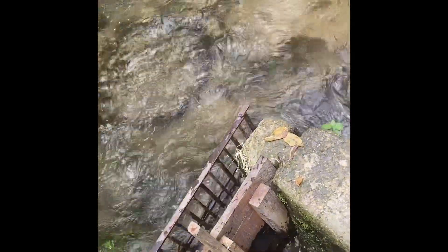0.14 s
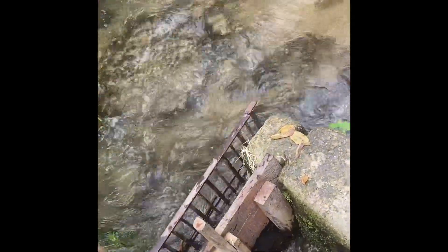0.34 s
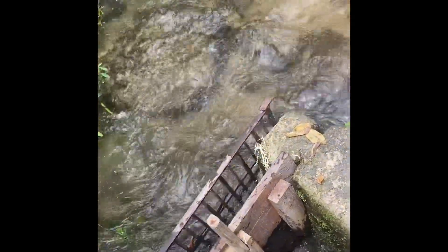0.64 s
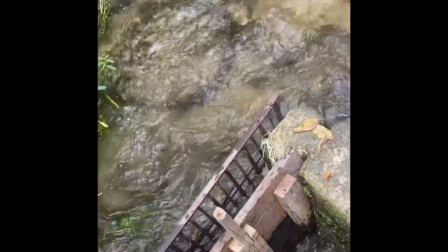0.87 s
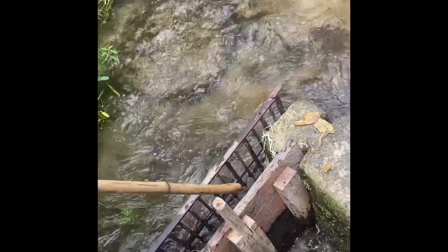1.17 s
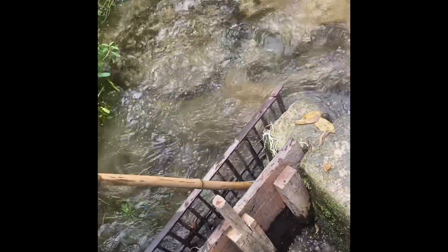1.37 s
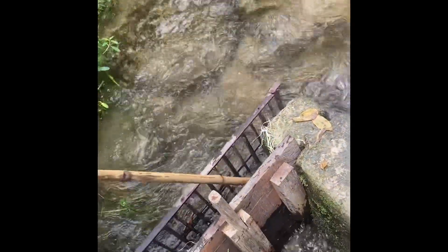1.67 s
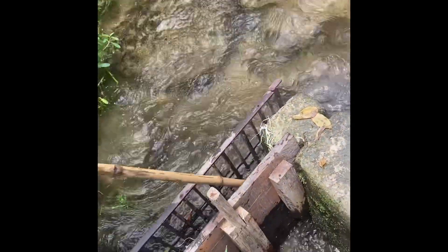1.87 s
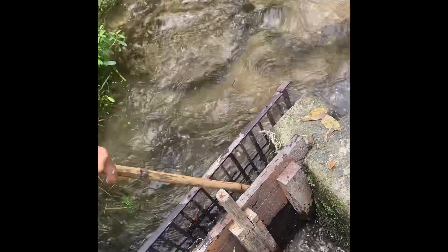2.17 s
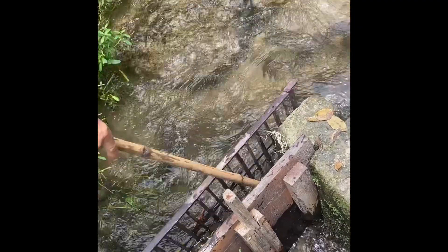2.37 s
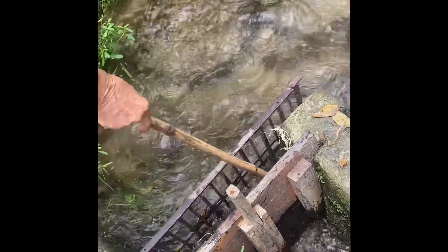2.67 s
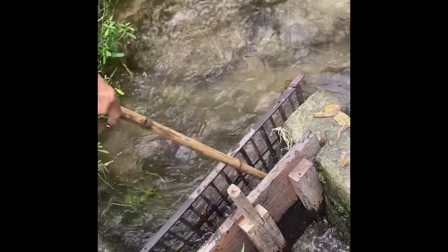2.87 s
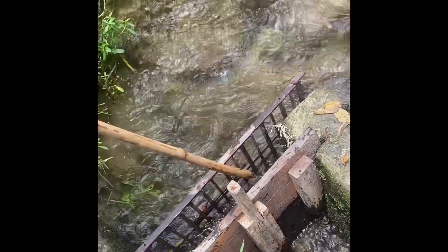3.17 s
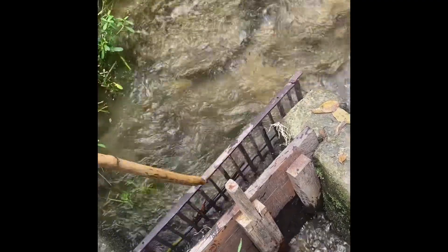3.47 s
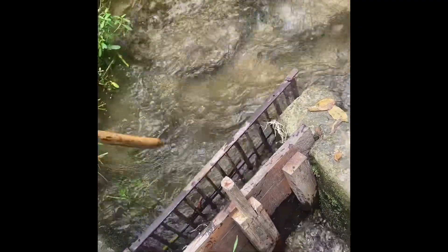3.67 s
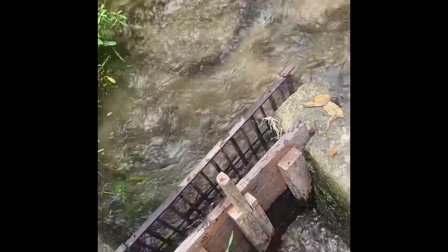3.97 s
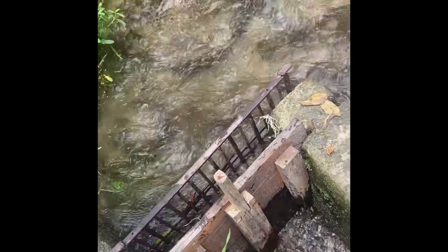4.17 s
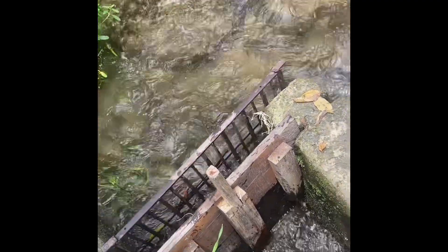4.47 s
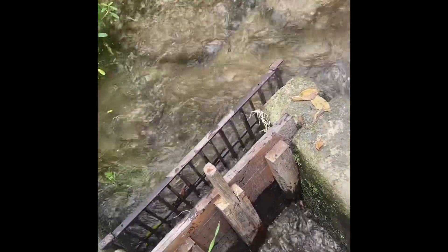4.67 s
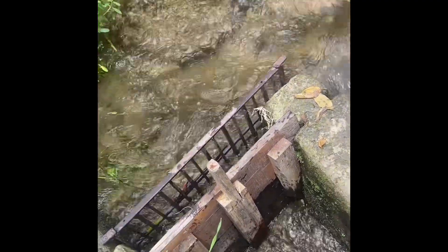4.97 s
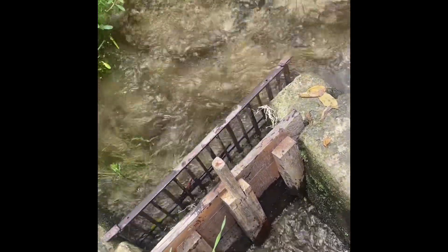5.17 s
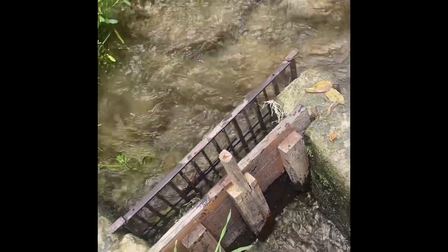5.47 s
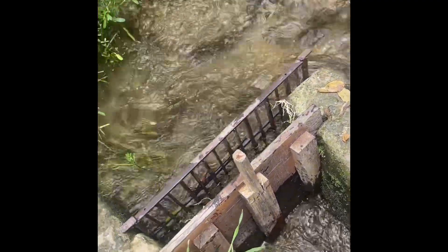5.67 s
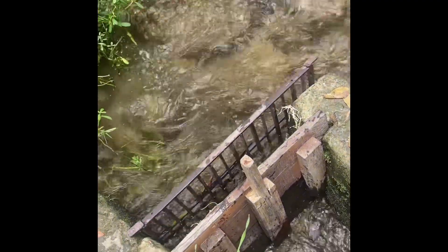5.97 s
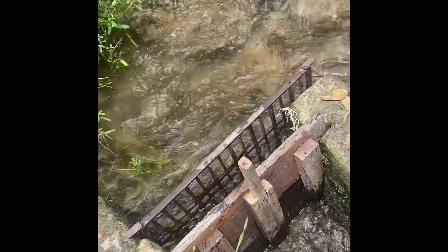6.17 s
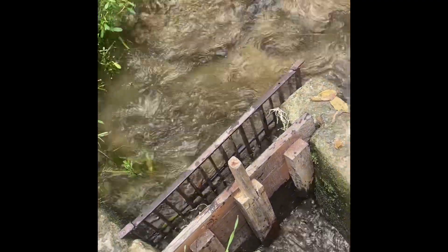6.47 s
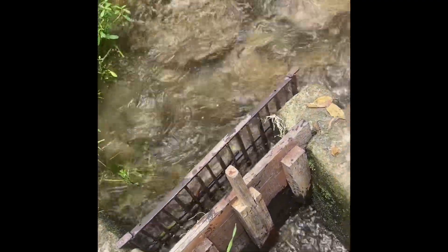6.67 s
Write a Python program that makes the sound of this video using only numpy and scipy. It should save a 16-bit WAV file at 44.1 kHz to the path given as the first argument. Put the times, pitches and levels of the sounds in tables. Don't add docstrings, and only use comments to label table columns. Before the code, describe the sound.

Fast water pours continuously through a narrow stone channel by a grate and wooden boards. A hollow low roar sits beneath dense bubbly churning and a thin sizzle of spray. Small plops and tiny drop ticks poke out irregularly. The level barely changes, with a slight lull near three seconds and a small surge soon after. Close handheld stereo pickup outdoors, its image shifting gently as the handset turns.

```python
import sys
import numpy as np
from scipy import signal
from scipy.fft import rfft, irfft, next_fast_len
from scipy.io import wavfile

SR = 44100
rng = np.random.default_rng(int(sys.argv[2]) if len(sys.argv) > 2 else 0)


def bounce(signal):
    frames = np.transpose(np.atleast_2d(signal))
    limited = np.clip(frames, -1, 1)
    pcm = np.round(limited * 32767).astype(np.int16)
    wavfile.write(sys.argv[1], SR, pcm)


def linear_from_db(decibels):
    return 10 ** (np.asarray(decibels, float) / 20)


N = 300762
SIZE = next_fast_len(N, real=True)

# (time [s], level about the mean [dB])
FLOW = [
    (0, 0),
    (.8, -0.5),
    (1.6, 0),
    (2.5, 0.4),
    (3, -1.2),
    (3.7, 1),
    (4.5, -0.6),
    (5, 0),
    (5.9, -0.5),
    (6.82, -0.5),
]
# (frequency [Hz], level per Hz [dB])
ROAR_SPECTRUM = [(13, -37), (30, -47), (48, -5.5), (86, -7.5), (118, 1), (177, -5.5), (232, 1), (374, -7),
                 (511, -1.5), (640, -2), (830, -39.5), (1410, -120)]
# (frequency [Hz], level per Hz [dB])
CHURN_SPECTRUM = [(450, -31), (620, -1.5), (760, 1), (950, 0.5), (1300, -4), (1600, -3), (1900, -3),
                  (2300, -7), (2700, -6.5), (3100, -9), (3500, -9), (4100, -12.5), (5200, -12.5),
                  (7000, -23)]
# (frequency [Hz], level per Hz [dB])
SPRAY_SPECTRUM = [(3500, -10.5), (5200, -2.5), (6500, 1.5), (7900, -1), (8100, 2), (11000, 2),
                  (12500, -0.5), (14200, -2), (15800, -7.5)]
# (time [s], pitch [Hz], peak level [dB])
PLOPS = [(0.198, 1860, -27), (0.54, 1250, -26), (0.808, 2790, -35.3), (0.909, 1937, -27.5),
         (1.51, 4650, -37.0), (1.96, 1317, -25.6), (2.59, 4108, -36.5), (2.703, 2945, -37.2),
         (3.429, 4185, -37.7), (3.574, 1395, -28.5), (3.765, 2712, -29.8), (4.061, 4030, -34.3),
         (4.151, 3565, -37.9), (4.851, 1007, -24.9), (4.854, 4650, -33.9), (5.217, 2557, -31.7),
         (5.251, 2324, -32.3), (5.298, 1240, -21.8), (5.986, 2557, -31.2)]
# (time [s], pitch [Hz], peak level [dB])
TICKS = [(0.346, 10680, -33.2), (0.36, 12403, -34.2), (0.603, 9646, -28.5), (0.632, 6546, -32.8),
         (0.874, 15159, -30.6), (0.907, 15159, -32.0), (1.83, 15159, -31.2), (1.962, 12403, -30.3),
         (2.492, 6546, -30.3), (2.805, 12403, -29.3), (3.437, 9302, -24.7), (3.774, 13436, -28.4),
         (3.999, 9646, -27.6), (4.07, 6546, -31.2), (4.492, 10680, -30.6), (4.89, 15159, -28.3),
         (4.988, 11369, -31.2), (5.966, 12058, -34.9), (6.126, 15159, -33.3)]
# (frequency [Hz], phase apart [rad], how closely the difference follows the sum [-1 to 1])
BASS_LEVEL = [(230, 0, -.2), (473, .55, -.45), (600, .25, -.6), (660, .45, .3), (732, 1.5, .75),
              (820, 2.4, .95), (900, 2.7, .95), (1050, 2.7, .75)]
# (frequency [Hz], phase apart [rad], how closely the difference follows the sum [-1 to 1])
BASS_TURNED = [(230, 0, -.1), (473, .72, -.4), (560, .62, -.95), (646, 1.85, -.75), (725, 2.95, -.2),
               (860, 2.98, .45), (950, 2.8, .75), (1050, 2.65, .8)]
# (frequency [Hz], phase apart [rad], how closely the difference follows the sum [-1 to 1])
MIDDLE_PORTS = [(1214, 2.34, .8), (1537, 2.4, .8), (1875, 1.85, 0.2), (2410, 2.028, 0.92),
                (3230, 2.304, 0.33), (3630, 2.35, -0.31), (4080, 1.49, -0.17), (5134, 2.345, -0.069)]
# (time [s], turn [0 level to 1 away])
TURN = [
    (0, -.3),
    (.6, 0),
    (2.1, .05),
    (2.8, .9),
    (3.4, 1),
    (4.2, 1),
    (4.8, .93),
    (6.4, .05),
    (6.82, 0),
]
# (frequency [Hz], threshold relative to the partner [dB])
PAIR_DROP = [(300, -21), (800, -19.5), (1600, -10.5), (3400, -9), (4900, -6.5), (6100, -11), (9300, -13),
             (14000, -9.5)]
BAND_WIDTHS = [(0, 4), (40, 8), (96, 12), (144, 16), (176, 20), (216, 24), (264, 28), (320, 32)]
# (from [Hz], to [Hz])
NO_DIFFERENCE = [
    (7580, 8950),
    (14470, 22050),
]

ROAR_DB, CHURN_DB, SPRAY_DB = -30.3, -31.5, -35
ROAR_FOLLOWS, CHURN_FOLLOWS, SPRAY_FOLLOWS = 0.17, 0.31, 1.2
OPPOSED_HZ, PORT_LAG_S, TREBLE_TIED = 5400, 158e-6, .8
FRAME_START = 365


def rms_one(x):
    return x / np.sqrt(np.mean(x ** 2) + 1e-20)


def at_hz(points, hz, column=1):
    points = np.array(points)
    return np.interp(np.log(hz + 1), np.log(points[:, 0]), points[:, column])


def drift(rate):
    r = np.exp(-40 * np.pi * rate / SR)
    slow = signal.lfilter([1], [1, -2 * r, r * r], rng.standard_normal(N // 20 + 3002))[3000:]
    return np.interp(np.arange(N) / 20, np.arange(len(slow)), rms_one(slow))


def patchy_noise(spectrum, shared_db, shared_rate, own_db, own_rate, fall_db, count):
    hz = np.fft.rfftfreq(SIZE, 1 / SR)
    low_hz, high_hz = spectrum[0][0], spectrum[-1][0]
    octaves_out = np.log2(np.maximum(low_hz / (hz + 1), 1) * np.maximum(hz / high_hz, 1))
    shape = linear_from_db(at_hz(spectrum, hz) - fall_db * octaves_out)
    noise = rfft(rng.standard_normal((2, SIZE))) * shape
    place = count * np.log2((hz + 1) / low_hz)
    last = int(count * np.log2(high_hz / low_hz)) + 1
    together = drift(shared_rate)
    out = 0
    for k in range(last + 1):
        band = np.clip(1 - np.abs(np.clip(place, 0, last) - k), 0, 1)
        flicker = linear_from_db(shared_db * together + own_db * drift(own_rate))
        out = out + irfft(noise * band, SIZE)[:, :N] * flicker
    return rms_one(out)


def add_bubble(out, start_s, hz, peak, cycles, rise):
    length = cycles / hz * SR
    age = np.arange(int(length)) / length
    tone = np.sin(2 * np.pi * cycles * (age + .5 * rise * age ** 2))
    wave = peak * tone * np.exp(-4.0 * age) * (1 - np.exp(-25 * age))
    i = int(start_s * SR)
    out[..., i:i + len(wave)] += wave[:N - i]


def bubbles(low_hz, high_hz, tilt_db, cycles, spread_db, rise, count):
    out = np.zeros((2, N))
    for row in out:
        for when, pitch, size, length in rng.random((count, 4)):
            peak = linear_from_db(tilt_db * pitch - spread_db * np.log(1.004 - size))
            hz = low_hz * (high_hz / low_hz) ** pitch
            add_bubble(row, when * N / SR, hz, peak, cycles * (0.57 + length), rise)
    return rms_one(out)


def roar():
    return patchy_noise(ROAR_SPECTRUM, shared_db=0.85, shared_rate=7.8, own_db=1.74, own_rate=17.6,
                        fall_db=42, count=1)


def white_water():
    churn = patchy_noise(CHURN_SPECTRUM, shared_db=0.16, shared_rate=18.0, own_db=2.0, own_rate=9.0,
                         fall_db=4, count=3)
    dense = bubbles(900, 6000, tilt_db=-10, cycles=23, spread_db=2.0, rise=0.27, count=2600)
    sparse = bubbles(1000, 3000, tilt_db=-6, cycles=26, spread_db=3.0, rise=.2, count=260)
    return churn + linear_from_db(-6.5) * dense + linear_from_db(-9) * sparse


def spray():
    hiss = patchy_noise(SPRAY_SPECTRUM, shared_db=1.6, shared_rate=52.0, own_db=0.3, own_rate=38.0,
                        fall_db=30, count=3)
    drops = bubbles(8500, 15000, tilt_db=2.0, cycles=5.0, spread_db=2.5, rise=0.077, count=3000)
    return hiss + linear_from_db(-6.0) * drops


def plops_and_ticks():
    out = np.zeros((2, N))
    for s, hz, db in PLOPS:
        add_bubble(out, s, hz, linear_from_db(db + 4.5), cycles=.015 * hz, rise=.35)
    for s, hz, db in TICKS:
        add_bubble(out, s, hz, linear_from_db(db + 6), cycles=10.4, rise=.1)
    return out


def ports(water, bass):
    hz = np.fft.rfftfreq(SIZE, 1 / SR)
    points = np.vstack([bass, MIDDLE_PORTS, (OPPOSED_HZ, np.pi, TREBLE_TIED)])
    lead = at_hz(points, hz) - 2 * np.pi * PORT_LAG_S * np.maximum(hz - OPPOSED_HZ, 0)
    tied = np.clip(at_hz(points, hz, column=2), -1, 1)
    direct, scattered = rfft(water, SIZE)
    difference = tied * direct + np.sqrt(1 - tied ** 2) * scattered
    mid = irfft(direct * np.cos(lead / 2), SIZE)[:N]
    side = irfft(-1j * np.sin(lead / 2) * difference, SIZE)[:N]
    return np.array([mid + side, mid - side])


def scene():
    seconds = np.arange(N) / SR
    swing_db = np.interp(seconds, *np.transpose(FLOW))
    water = linear_from_db(ROAR_DB + ROAR_FOLLOWS * swing_db) * roar()
    water = water + linear_from_db(CHURN_DB + CHURN_FOLLOWS * swing_db) * white_water()
    water = water + linear_from_db(SPRAY_DB + SPRAY_FOLLOWS * swing_db) * spray()
    water = water + plops_and_ticks()
    turn = np.interp(seconds, *np.transpose(TURN))
    return (1 - turn) * ports(water, BASS_LEVEL) + turn * ports(water, BASS_TURNED)


def thin_pair(x, swing_spread_db, line_db):
    lead_in = 1024 - FRAME_START
    x = np.pad(x, ((0, 0), (lead_in, 0)))
    window = np.sin(np.pi * (np.arange(2048) + .5) / 2048)
    frames = dict(fs=SR, window=window, nperseg=2048, noverlap=1024)
    hz, times, pair = signal.stft([x[0] + x[1], x[0] - x[1]], **frames)
    strictness = rng.standard_normal(len(times))
    low = 0
    while low < len(hz):
        high = low + [width for first, width in BAND_WIDTHS if first <= low][-1]
        lines = np.abs(pair[:, low:high]) ** 2
        power = lines.mean(axis=1)
        swing_db = swing_spread_db * (strictness + rng.standard_normal(len(times)))
        limit = power[::-1] * linear_from_db(2 * (at_hz(PAIR_DROP, hz[low]) + swing_db))
        band_kept = (power > limit)[:, None]
        line_kept = lines > limit[:, None] * linear_from_db(2 * line_db)
        pair[:, low:high] *= band_kept * line_kept
        low = high
    pair[:, hz > 15750] = 0
    pair[0, (hz > 11030) & (hz < 12400)] *= strictness < -1.9
    for from_hz, to_hz in NO_DIFFERENCE:
        pair[1, (hz > from_hz) & (hz < to_hz)] = 0
    total, difference = signal.istft(pair, **frames)[1][:, lead_in:][:, :N]
    return np.array([total + difference, total - difference]) / 2


def band_limit(x):
    return signal.sosfilt(signal.butter(12, 16140, fs=SR, output="sos"), x)


def record(dry):
    right_louder_db = .35
    leaning = dry * linear_from_db([[-right_louder_db / 2], [right_louder_db / 2]])
    mix = thin_pair(leaning, swing_spread_db=2.22, line_db=2.5)
    return band_limit(mix)


dry = scene()
out = record(dry)
bounce(out)
```